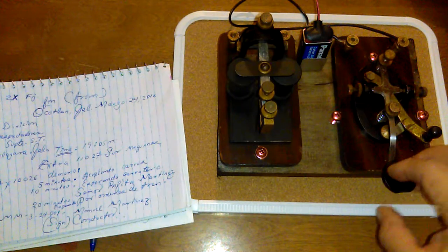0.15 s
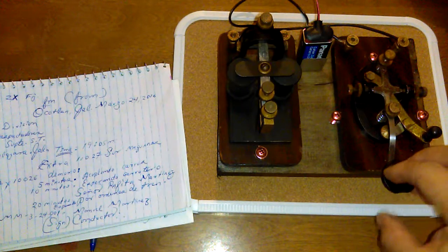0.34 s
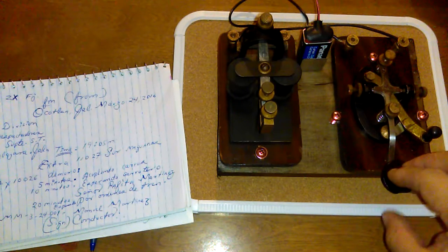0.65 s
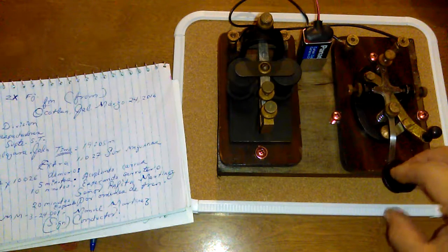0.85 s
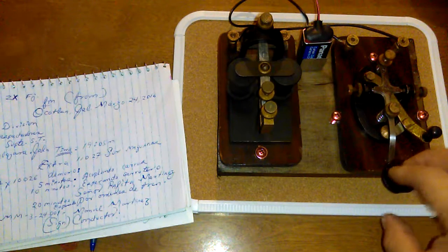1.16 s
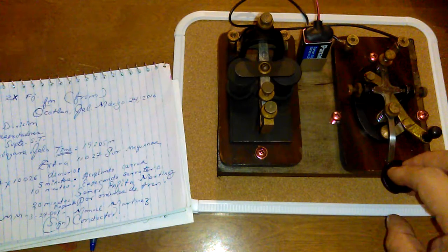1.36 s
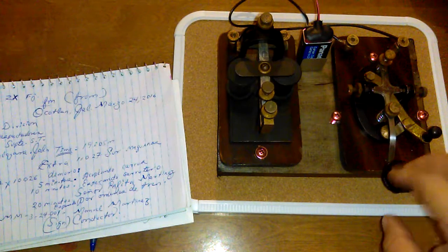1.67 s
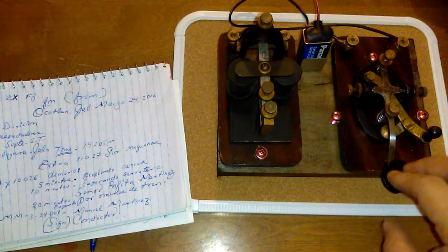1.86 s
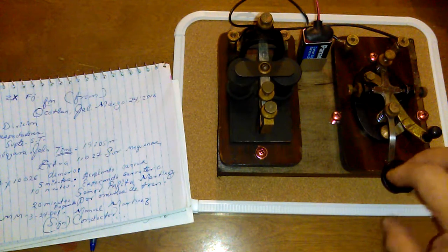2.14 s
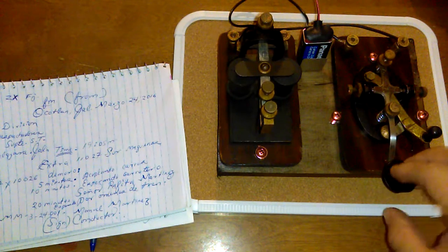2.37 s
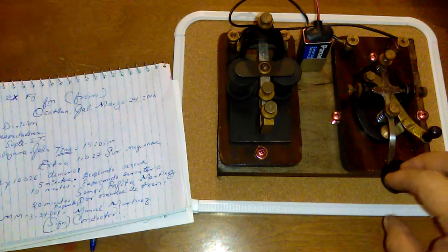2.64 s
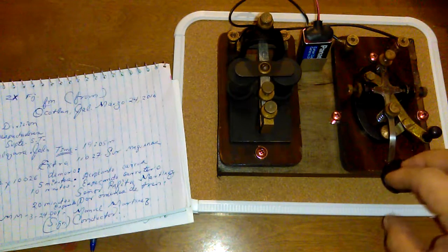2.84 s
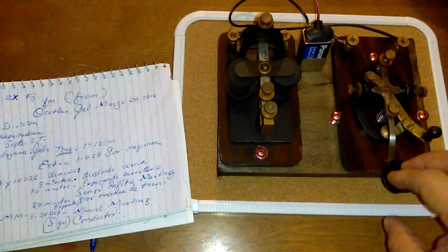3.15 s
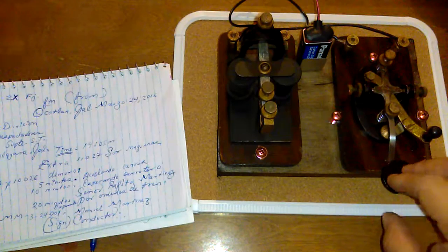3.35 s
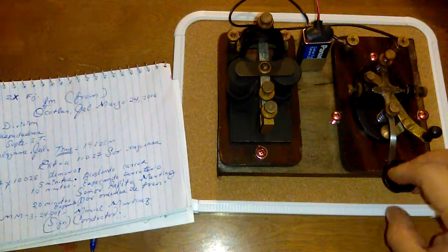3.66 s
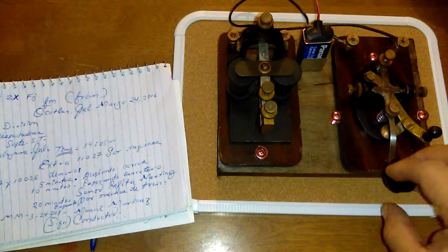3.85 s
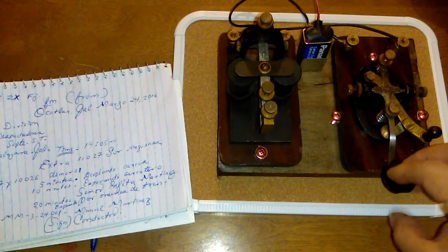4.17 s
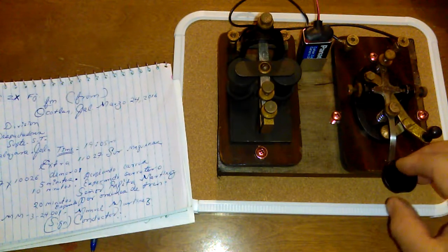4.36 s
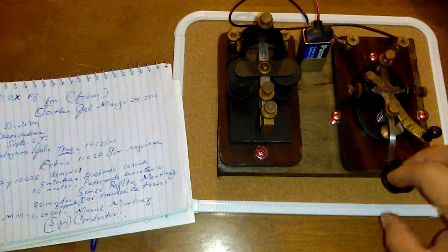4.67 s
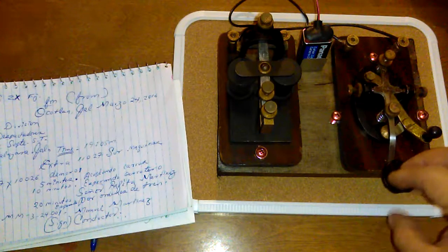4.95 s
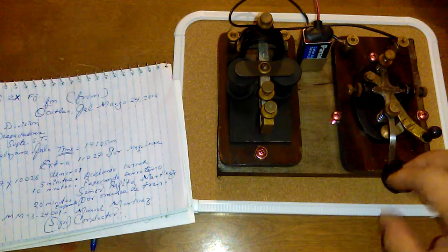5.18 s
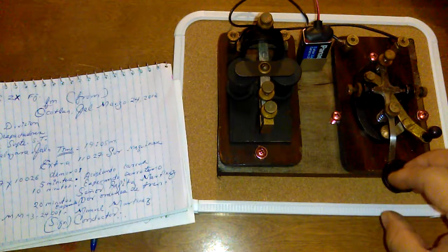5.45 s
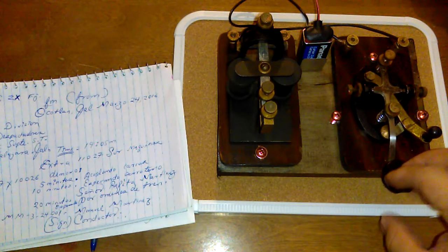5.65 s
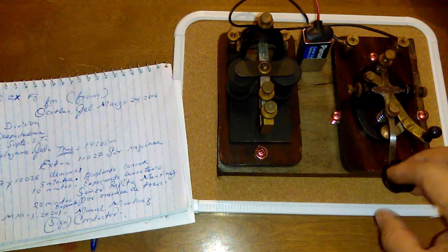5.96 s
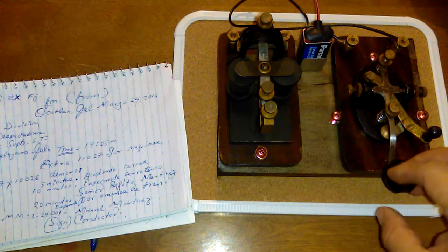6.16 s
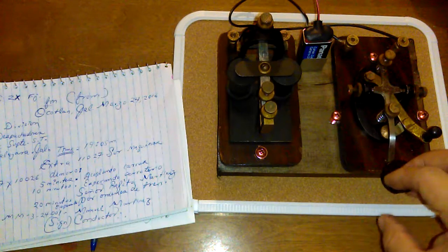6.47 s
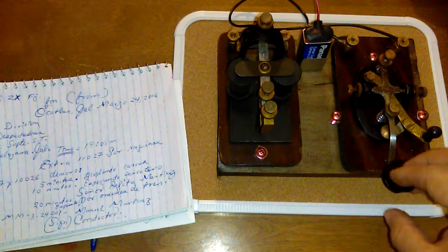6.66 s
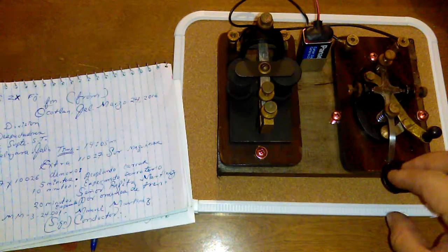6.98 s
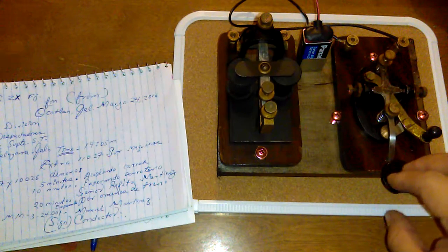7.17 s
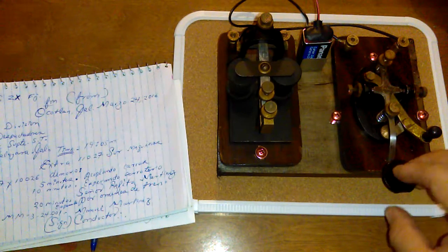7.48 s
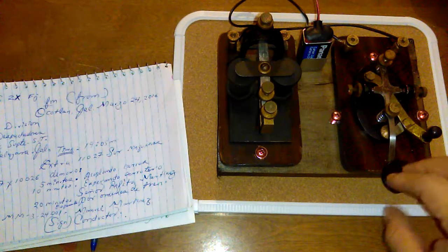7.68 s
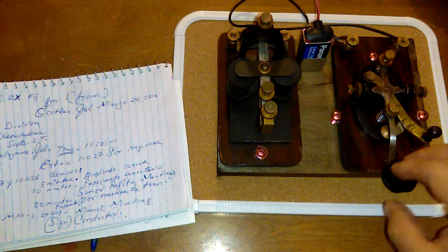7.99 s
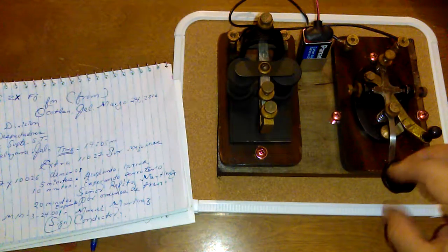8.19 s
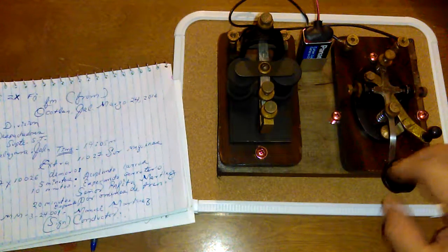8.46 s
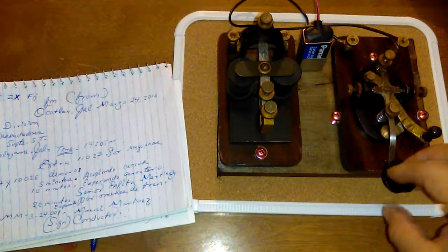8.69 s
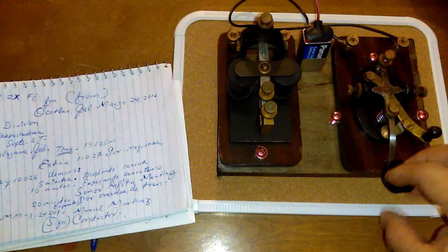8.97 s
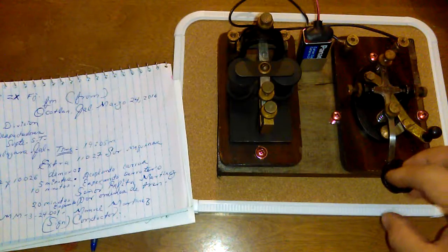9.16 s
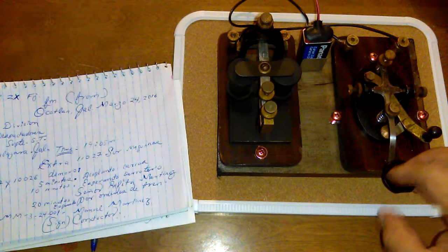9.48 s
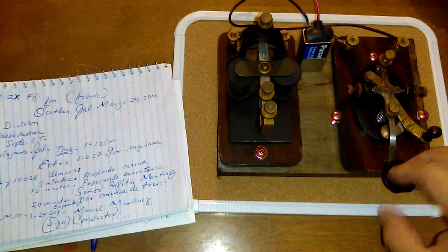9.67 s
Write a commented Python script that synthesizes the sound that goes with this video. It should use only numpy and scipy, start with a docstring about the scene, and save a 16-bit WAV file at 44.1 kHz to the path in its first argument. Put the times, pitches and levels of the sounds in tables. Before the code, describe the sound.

A telegraph key and sounder click out a message in quick, uneven metallic clacks in a quiet room.

```python
"""A quiet room: a hand sends on a telegraph key wired to a sounder, both on one wooden board.
Each mark is three blows: the key closes, 15 ms later the magnet pulls the lever onto its anvil,
and on release the lever springs back against its upper stop. Each blow is a burst of metal chatter
through the resonances of the part, the board and the room. A low rumble and a faint hum fill the pauses."""
import sys
import numpy as np
from scipy import signal
from scipy.fft import rfft, irfft
from scipy.io import wavfile
from scipy.ndimage import uniform_filter1d

SR = 44100
rng = np.random.default_rng(int(sys.argv[2]) if len(sys.argv) > 2 else 0)


def dump_mix(stems):
    """Bounce the given channels to the path in sys.argv[1] as a 16-bit WAV at rate SR."""
    frames = np.atleast_2d(stems).T  # one column per channel
    limited = np.clip(frames, -1, 1)  # hard clip at full scale
    pcm = np.round(limited * 32767).astype(np.int16)
    wavfile.write(sys.argv[1], SR, pcm)


N = 433503

# dots and dashes: close_s, held_s, key_level_db
MARKS = [(-0.13, 0.074, 3), (0.3472, 0.048, 0.3), (0.4754, 0.046, -0.6), (0.6032, 0.15, -4),
         (0.8058, 0.057, 1.5), (0.929, 0.052, 2.5), (1.1889, 0.356, -5), (1.7413, 0.115, -2.7),
         (1.9202, 0.103, -1.2), (2.1445, 0.048, -1), (2.2553, 0.053, 1), (2.4722, 0.098, -2.6),
         (2.6325, 0.05, 0.7), (2.824, 0.041, -2), (2.9512, 0.049, -4), (3.099, 0.14, -5.5),
         (3.3638, 0.14, -4), (3.6137, 0.039, -2.2), (3.763, 0.05, 0), (3.9695, 0.041, -2.7),
         (4.0683, 0.051, 1.2), (4.1938, 0.056, 2), (4.512, 0.06, 1.8), (4.7269, 0.047, 0.9),
         (4.85, 0.06, 2), (4.9945, 0.054, 2.5), (5.2468, 0.038, -1.5), (5.3726, 0.05, 0.0),
         (5.5422, 0.046, -1.0), (5.6966, 0.046, -1), (5.8456, 0.041, -2.3), (6.065, 0.041, -0.1),
         (6.3036, 0.043, 0.5), (6.5057, 0.044, 0.2), (6.6246, 0.048, 0), (6.8226, 0.043, 0),
         (6.9622, 0.12, -3.5), (7.2016, 0.11, -5), (7.3701, 0.047, 0.2), (7.5779, 0.12, -0.5),
         (7.7645, 0.05, 0.9), (7.8936, 0.05, 0.5), (8.1011, 0.047, 3.2), (8.2691, 0.045, -0.5),
         (8.5182, 0.05, 7), (8.6607, 0.054, 1.7), (8.8313, 0.058, 1.5), (8.998, 0.052, 1),
         (9.1486, 0.043, -1), (9.3621, 0.042, 3), (9.5512, 0.046, 2.9), (9.7507, 0.043, 2.5)]
# resonances of key and board: centre_hz, half_width_hz, left_db, right_db, room_db
KEY_MODES = [(540, 340, -2, -0.5, -12), (896, 24, 9.5, -5, -10), (1180, 126, 12.5, 12.5, -3),
             (1870, 260, -24, 2.5, -15), (2230, 176, 17, -8.5, -1), (2215, 81, 11, 17, -22),
             (2750, 96, 4, 3.5, -12), (3240, 79, 1.5, -5, -6), (3510, 420, 6.5, 3, -7),
             (4600, 280, 0.5, 3, -22), (5240, 340, -14.5, -9.5, -22), (6330, 430, 7, 2.5, -3.5),
             (6500, 280, 4, -22.5, -8.5), (7600, 390, -2, -5, -18.5), (8108, 890, -8.5, -30.5, -13.5),
             (9921, 520, -4, -20, -21), (11230, 999, 2, -28, -19), (13000, 860, -12.5, -19.5, -16.5),
             (14905, 999, -13.5, -23.5, -49)]
# resonances of lever on anvil: centre_hz, half_width_hz, left_db, right_db, room_db
ANVIL_MODES = [(427, 140, -12, -1, -10), (776, 380, 1, -8, -7), (883, 405, -17.5, -19, -18),
               (1282, 76, 11, 16, 2), (1775, 58, 11.5, 14.5, 7), (2128, 35, 18, 17, 13),
               (2310, 79, 24, 13, 9), (2494, 76, 25, 23.5, 11.5), (3107, 260, 16, 14, 5),
               (3230, 170, -3, -4, 7), (4444, 150, 19, 18.5, 4), (4915, 570, -7, -8.5, 7.5),
               (5094, 43, 12.5, 21, -11.5), (5860, 110, 11.5, 18.5, -11), (6230, 570, -1.3, -8.5, -11.5),
               (7680, 274, 10.5, 6, -3.5), (8800, 1200, -1, -2.5, -9.5), (9680, 340, 8.5, -27, -23.5),
               (10200, 173, 18.5, 8, 5), (10867, 439, -13, -9, -6.5), (11910, 450, 19, -8, -3.5),
               (12760, 381, 13.5, -8.5, -7.5), (13500, 540, -26.5, -14, -44.5)]
# resonances of lever on upper stop: centre_hz, half_width_hz, left_db, right_db, room_db
STOP_MODES = [(340, 172, 5, 5, 1.5), (861, 48, 12.5, 4.5, 5), (1220, 107, 13.5, 16, 6),
              (1695, 60, 16.5, 23, 6.5), (2120, 59, 21.5, 16, 14.5), (2377, 165, 20.5, 0, 11.5),
              (2928, 67, 25, 19, 7), (3137, 220, 15, 15, 6.5), (3800, 63, 9, 2.5, -11),
              (4630, 193, 16, 13, 3.5), (4500, 940, -13.5, 10.5, -0.5), (5680, 90, -9, -6, -18.5),
              (6060, 170, 10, -12, 0), (7070, 510, -10, 10, -6), (7717, 93, 20.5, 14.5, 5),
              (8300, 51, 4.5, 16, -13), (8860, 800, 7, 1, -5), (10120, 236, 17, 4.5, 0),
              (12000, 460, -8, -24, -11), (12100, 1800, 6, -16.5, -14), (12900, 215, 3.5, 1, -14.5),
              (14556, 588, -1.5, -18, -33.5)]
# lingering tones of brass frame and board: pitch_hz, anvil_db, stop_db
FRAME_TONES = [(601, -31, -23), (890, -33, -28.5), (1240, -38, -42.5), (1278, -28, -26.5),
               (2098, -24.5, -21), (2078, -27.5, -21), (2050, -38.5, -32.5), (2110, -20.5, -24.5),
               (2220, -14.5, -35), (2460, -15, -24), (2640, -28, -16.5), (2870, -29.5, -19.5),
               (3027, -13.5, -24.5), (3065, -32.5, -43), (3160, -30, -23), (4350, -43, -32),
               (4220, -31.5, -42), (4830, -12.5, -38), (4400, -32, -17.5), (4760, -32, -35),
               (5330, -35.5, -40.5), (7652, -32, -35.5), (9600, -35, -35)]
# echo colour of a nearby hard surface: freq_hz, gain_db
ECHO_COLOUR = [(300, -16), (1200, -12), (2400, -9), (5000, -6), (5800, 4), (6500, 5), (7500, -3),
               (15000, -8)]
# reverb decay: freq_hz, t60_s
ROOM_T60 = [(300, 0.5), (1200, 0.24), (2400, 0.31), (5000, 0.34), (8000, 0.24), (12000, 0.23), (16000, .16)]
# reverb balance: freq_hz, left_minus_right_db
ROOM_LEAN = [(300, -0.5), (900, -3.5), (1600, -12.5), (2400, -5), (4000, -12), (6000, -14), (8000, -5.5),
             (10000, 0.5), (15000, -3)]
# room noise spectrum: freq_hz, relative_db
AIR_SPECTRUM = [(18, -38), (30, -11.5), (194, -3), (280, -7.5), (449, -16), (554, -17), (616, -16.5),
                (801, -15), (1040, -14), (1320, -22), (1540, -19), (4080, -37), (16000, -42)]
# room noise, left against right: freq_hz, correlation
AIR_CORRELATION = [(60, 0.89), (250, 0.94), (550, 0.51), (1600, .2), (5000, 0.22), (15000, .05)]
# rumble envelopes before trim: time_s, deep_db, middle_db, upper_db
RUMBLE_LEVELS = [(0, -59, -64, -57.5), (0.35, -55.5, -60.5, -51), (0.75, -52, -64, -56),
                 (1.55, -55.5, -63.5, -51.5), (2.1, -64, -67, -53.5), (3.0, -68, -71, -61),
                 (4.7, -67, -62, -61), (5.2, -57.5, -64, -62), (6.2, -66, -61, -58.5),
                 (6.85, -55, -55, -51.5), (7.4, -58, -50, -58), (7.95, -58, -67, -57), (8.4, -51, -65, -56),
                 (9.0, -57, -52, -50.5), (9.83, -56, -65, -58)]
# low room resonances, one table per rumble part: centre_hz, half_width_hz, relative_db
DEEP_MODES = [(42, 4.8, -1.5), (65, 7, -0.5), (92.3, 7.4, 0)]
MIDDLE_MODES = [(132, 9.2, 0)]
UPPER_MODES = [(172, 13, -0.5), (192, 8, -1.5), (213.5, 11, -1), (255, 16, -9)]

LEAD_SAMPLES = SR // 4  # sending starts before time zero
RIGHT_LAG_S, ECHO_DELAY_S = .00016, .0066  # the sounder is nearer the left microphone


def telegraph():
    """Key tick, bright lever clack on the anvil, looser clunk on the upper stop."""
    taps, pulls, releases = strokes()
    pitch_hz, anvil_db, stop_db = np.transpose(FRAME_TONES)
    key = blows(taps, KEY_MODES, rise_s=.00016, length_s=.0029, vary=.21, scatter=5.6,
                direct_db=.5, echo_db=-2.5, room_db=6)
    anvil = blows(pulls, ANVIL_MODES, rise_s=.0003, length_s=.002, vary=.25, scatter=1,
                  direct_db=.5, echo_db=-15.5, room_db=3,
                  ring=frame_ring(zip(pitch_hz, anvil_db), gain_db=-1, t60_s=.3, lean_db=-11.5))
    stop = blows(rebounds(releases), STOP_MODES, rise_s=.00087, length_s=.0047, vary=.38, scatter=1,
                 direct_db=-1, echo_db=-12, room_db=1.5,
                 ring=frame_ring(zip(pitch_hz, stop_db), gain_db=2, t60_s=.32, lean_db=-9))
    return key + anvil + stop


def strokes(pull_s=.0148, pull_spread_s=.0003, lever_spread_db=.42):
    """Key, anvil and stop hits (start_s, level_db). Magnet and spring keep the lever's force near even."""
    close_s, held_s, key_db = np.transpose(MARKS)
    late, down, up = rng.standard_normal((len(MARKS), 3)).T
    return (np.column_stack([close_s, key_db]),
            np.column_stack([close_s + pull_s + pull_spread_s * late, lever_spread_db * down]),
            np.column_stack([close_s + held_s, lever_spread_db * up]))


def rebounds(hits, softest_db=-19, range_db=6, earliest_s=.01, latest_s=.026):
    """The released lever bounces once more on its stop, at a random delay."""
    when, force = rng.random((len(hits), 2)).T
    delay_s = earliest_s + when * (latest_s - earliest_s)
    bounces = hits + np.column_stack([delay_s, softest_db + range_db * force])
    return np.vstack([hits, bounces])


def blows(hits, modes, rise_s, length_s, vary, scatter, direct_db, echo_db, room_db,
          ring=0, split_hz=1500):
    """A part strikes one spot: nearly the same chatter each time, through its resonances and the room."""
    usual = chatter(rise_s, length_s)
    scattered = unit_energy(usual + scatter * chatter(2 * rise_s, 1.277 * length_s))
    near, far = np.zeros((2, 1, LEAD_SAMPLES + N))
    for start_s, level_db in hits:
        variation = vary * chatter(3 * rise_s, length_s)
        at_s = start_s + LEAD_SAMPLES / SR
        add(near, at_s, amp(level_db) * unit_energy(usual + variation)[None])
        add(far, at_s + RIGHT_LAG_S, amp(level_db) * unit_energy(scattered + variation)[None])
    # right side: same bass, later treble scattered off the board
    lowpass = signal.firwin(129, split_hz, fs=SR)[None]
    far = far + signal.oaconvolve(near - far, lowpass, "same")
    to_left, to_right, to_room = body(modes)
    direct = amp(direct_db) * convolve(np.vstack([near, far]), np.array([to_left, to_right]))
    # one bright echo off a hard surface on the right
    echo = convolve(direct[1], minimum_phase(lambda hz: amp(echo_db + log_interp(ECHO_COLOUR, hz))))
    add(direct, ECHO_DELAY_S, echo * [[0], [1]])
    tail = amp(room_db) * convolve(room_reverb(), to_room) + ring
    return (direct + convolve(near, tail))[:, LEAD_SAMPLES:]


def chatter(rise_s, length_s, samples=640, passes=8):
    """Metal chatters on metal for a few milliseconds: a burst with an even spectrum."""
    t = np.arange(samples) / SR
    envelope = (1 - np.exp(-(t + 1 / SR) / rise_s)) * np.exp(-(t / length_s) ** 1.5)
    burst = rng.standard_normal(samples) * envelope
    for _ in range(passes):  # flatten the spectrum, restore the envelope
        burst = irfft(np.exp(1j * np.angle(rfft(burst))))
        burst *= envelope / np.sqrt(uniform_filter1d(burst ** 2, size=40) + 1e-12)
    return unit_energy(burst)


def body(modes, cutoff_hz=290):
    """Left, right and room responses of a struck part; the small board radiates no bass."""
    centre_hz, width_hz, left_db, right_db, room_db = np.transpose(modes)[:, :, None]

    def response(level_db, half_width_hz):
        def gain(hz):
            peaks = amp(level_db) / (1 + ((hz - centre_hz) / half_width_hz) ** 2)
            return np.linalg.norm(peaks, axis=0) * hz ** 3 / np.hypot(hz ** 3, cutoff_hz ** 3)
        return minimum_phase(gain)

    # summed over all directions, modes merge into broader, lower peaks
    broad_hz = np.hypot(width_hz, 120)
    merged_db = room_db + 10 * np.log10(width_hz / broad_hz)
    return response(left_db, width_hz), response(right_db, width_hz), response(merged_db, broad_hz)


def frame_ring(partials, gain_db, t60_s, lean_db):
    """Lightly damped frame and board tones; left-right phase difference grows with pitch."""
    t = np.arange(SR // 2) / SR
    tones = 0
    for pitch_hz, level_db in partials:
        path_s = rng.random((2, 1)) * .0003
        tones = tones + amp(level_db) * np.sin(2 * np.pi * (pitch_hz * (t + path_s) + rng.random()))
    decay = unit_energy(amp(-60 * t / t60_s))
    return amp(gain_db + lean_db * np.array([[.5], [-.5]])) * tones * decay


def room_reverb(early_gain=5, early_s=.007, build_s=.0042, shared_below_hz=650, fade_s=.33):
    """Dense reflections, strong at first from desk and near walls; treble dies soonest."""
    t = np.arange(SR // 2) / SR
    hz, frame_s, frames = signal.stft(rng.standard_normal((2, len(t))), SR, nperseg=256)
    frames *= amp(-60 * frame_s / log_interp(ROOM_T60, hz)[:, None])
    # long waves reach both microphones alike
    shared = 1 / (1 + (hz[:, None] / shared_below_hz) ** 4)
    frames[1] = shared * frames[0] + np.sqrt(1 - shared ** 2) * frames[1]
    tail = signal.istft(frames, SR, nperseg=256)[1][:, :len(t)]
    tail *= (1 + early_gain * np.exp(-t / early_s)) * (1 - np.exp(-(t / build_s) ** 2))
    # equal energy per band, then lean to one side
    spectrum, hz = rfft(tail), np.fft.rfftfreq(len(t), 1 / SR)
    spectrum /= np.sqrt(uniform_filter1d(abs(spectrum) ** 2, size=50, axis=1))
    lean = amp(np.outer([.5, -.5], log_interp(ROOM_LEAN, hz)))
    fade = np.exp(-(t / fade_s) ** 10)
    return fade * irfft(spectrum * lean / np.sqrt((lean ** 2).mean(0)))


def room_air(level_db=-51.5):
    """Steady room noise, bass alike on both sides."""
    hz = np.fft.rfftfreq(N, 1 / SR)
    left, independent = rfft(rng.standard_normal((2, N)))
    shared = log_interp(AIR_CORRELATION, hz)
    right = shared * left + np.sqrt(1 - shared ** 2) * independent
    colour = amp(log_interp(AIR_SPECTRUM, hz))
    return amp(level_db) * unit_rms(irfft(np.array([left, right]) * colour, N))


def rumble(deep_trim_db=-1, middle_trim_db=-2):
    """Three low bands of room boom, each swelling on its own."""
    t = np.arange(N) / SR
    time_s, deep_db, middle_db, upper_db = np.transpose(RUMBLE_LEVELS)
    return (amp(deep_trim_db + np.interp(t, time_s, deep_db)) * boom(DEEP_MODES)
            + amp(middle_trim_db + np.interp(t, time_s, middle_db)) * boom(MIDDLE_MODES)
            + amp(np.interp(t, time_s, upper_db)) * boom(UPPER_MODES))


def boom(modes):
    """Noise ringing in low room resonances, rms 1."""
    hz = np.fft.rfftfreq(N, 1 / SR)
    peaks = [amp(db) / (1 + ((hz - centre_hz) / width_hz) ** 2) for centre_hz, width_hz, db in modes]
    return unit_rms(irfft(rfft(rng.standard_normal(N)) * np.linalg.norm(peaks, axis=0), N))


def hum(pitch_hz=174.3, level_db=-61.5, waver_hz=.8, waver_db=4):
    """Faint tone, wavering in pitch and level."""
    freq_hz = pitch_hz + waver_hz * band_noise(.5, 5)
    envelope = amp(waver_db * band_noise(.3, 2))
    return amp(level_db) * unit_rms(envelope * np.sin(2 * np.pi * np.cumsum(freq_hz) / SR))


def band_noise(low_hz, high_hz):
    """Soft-edged noise band, rms 1."""
    hz = np.fft.rfftfreq(N, 1 / SR) + 1
    attenuation = 1 + (low_hz / hz) ** 10 + (hz / high_hz) ** 10
    return unit_rms(irfft(rfft(rng.standard_normal(N)) / attenuation, N))


def amp(db):
    return 10 ** (np.asarray(db) / 20)


def unit_rms(x):
    return x / np.sqrt(np.mean(x ** 2) + 1e-20)


def unit_energy(x):
    return x / np.linalg.norm(x, axis=-1, keepdims=True)


def log_interp(table, hz):
    """Table value on a log-frequency axis."""
    freq_hz, value = np.transpose(table)
    return np.interp(np.log(hz + 1), np.log(freq_hz + 1), value)


def add(mix, start_s, sound):
    """Mixes in a sound (channels x samples)."""
    part = mix[:, max(round(start_s * SR), 0):][:, :sound.shape[1]]
    part += sound[:, :part.shape[1]]


def convolve(x, response):
    """Filters x, keeping its length."""
    return signal.oaconvolve(np.atleast_2d(x), np.atleast_2d(response), axes=1)[:, :x.shape[-1]]


def minimum_phase(gain_at, fft_size=4096):
    """Causal impulse response with gain gain_at(hz)."""
    hz = abs(np.fft.fftfreq(fft_size, 1 / SR))
    log_gain = np.log(np.maximum(gain_at(hz), 1e-5))
    return np.fft.ifft(np.exp(np.conj(signal.hilbert(log_gain)))).real[:fft_size // 2]


def scene():
    """The telegraph in its room."""
    return telegraph() + room_air() + rumble() + hum()


def record(dry, cutoff_hz=16200):
    """Clip at full scale, then low-pass."""
    lowpass = signal.firwin(255, cutoff_hz, window=("kaiser", 9), fs=SR)[None]
    return signal.oaconvolve(np.clip(dry, -1, 1), lowpass, "same")


dry = scene()
out = record(dry)
dump_mix(out)
```